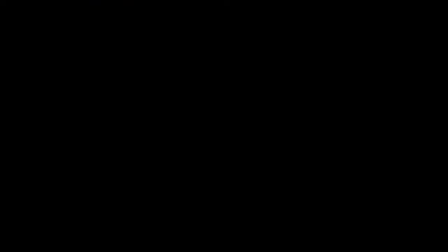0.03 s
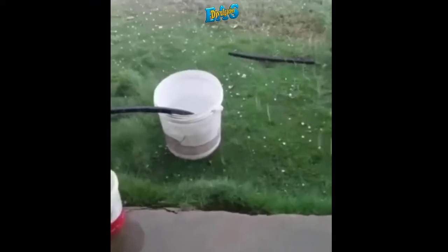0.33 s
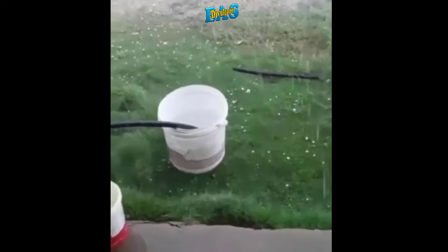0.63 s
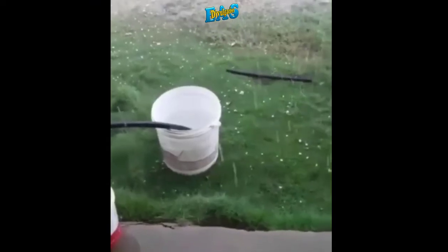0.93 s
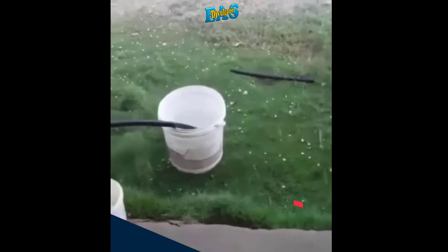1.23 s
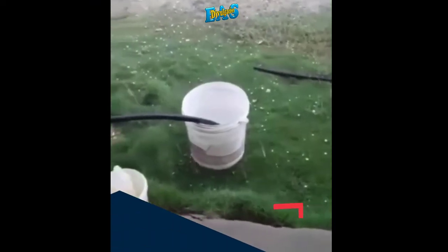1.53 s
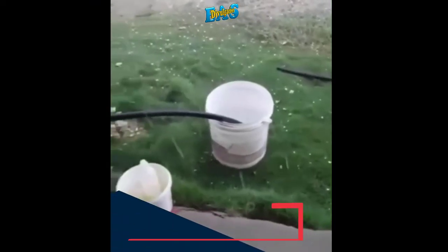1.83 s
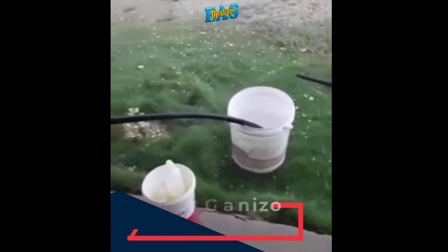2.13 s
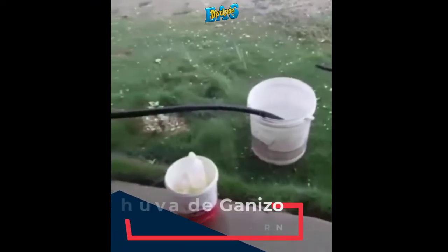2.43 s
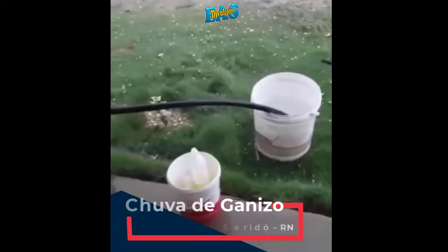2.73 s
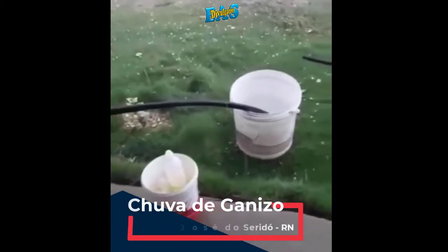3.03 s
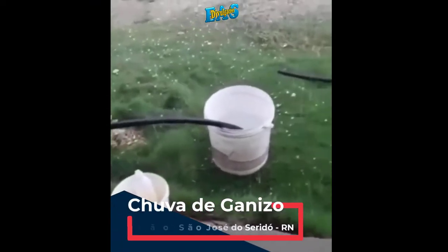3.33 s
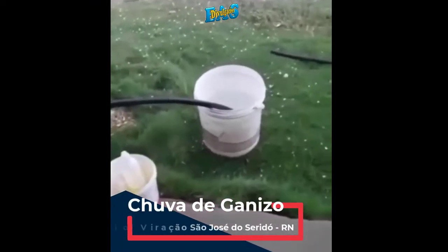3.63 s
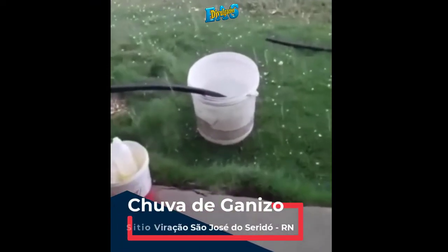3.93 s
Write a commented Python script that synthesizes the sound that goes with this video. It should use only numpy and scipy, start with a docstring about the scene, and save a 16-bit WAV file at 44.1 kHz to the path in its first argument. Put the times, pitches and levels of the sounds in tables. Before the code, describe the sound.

Hail and heavy rain pour onto a yard, with wind buffeting the microphone.

```python
"""Hail and heavy rain pour onto a yard of grass, paving and plastic buckets, fading in from silence.
Countless far impacts merge into a bed of hiss. Over it, near stones burst in short splashy cracks,
some with a brief ring from what they strike. Gusts rumble underneath and buffet the microphone
with low thumps. The mix is centred except for two treble bands that sound wide."""
import sys
import numpy as np
from scipy import signal
from scipy.fft import rfft, irfft
from scipy.io import wavfile
from scipy.ndimage import uniform_filter1d

SR = 44100
rng = np.random.default_rng(int(sys.argv[2]) if len(sys.argv) > 2 else 0)


def dump(signal):
    """Clip the signal to [-1, 1] and save it as 16-bit WAV at the path in sys.argv[1]."""
    limited = np.clip(np.atleast_2d(signal).T, -1, 1)
    pcm = np.round(limited * 32767).astype(np.int16)
    wavfile.write(sys.argv[1], SR, pcm)


N = 176400

# Tone of the hiss, plus an overall treble drop above 8 kHz. Each row: frequency in Hz, level in dB.
WASH_EQ = [(30, -25), (120, -16), (350, -16), (720, -10.5), (1100, -3.5), (1700, -2), (2250, -0.55),
           (3000, -2.5), (4600, 0), (6000, -1.5), (7800, -2), (8100, -7), (9000, -7.5), (10800, -14),
           (12900, -8.5), (13400, -37)]
# How hard it pours, riding both wash and patter. Each row: time in seconds, gain in dB.
DOWNPOUR_RIDE = [(.4, -27), (.6, -27), (.8, -26), (1.03, -29), (1.17, -31), (1.3, -28), (1.38, -32.5),
                 (1.46, -29.5), (1.7, -31), (1.97, -30), (2.1, -26), (2.18, -27.5), (2.5, -25),
                 (2.66, -27.5), (2.85, -26.5), (3.0, -26), (3.09, -28), (3.17, -26.5), (3.4, -25),
                 (3.75, -27), (4, -27)]
# Near hailstones. Each row: start in seconds, level in dB before trim, attack in seconds,
# brightness in dB per octave, ring pitch in Hz, ring against crack in dB before the ring boost.
NEAR_STONES = [(.397, -18, 0.0015, -5, 2230, -14), (.501, -26.5, 0.0031, 0, 4380, -3),
               (.586, -23, 0.0094, 2, 2345, -8.5), (.657, -26.5, .006, -0.5, 6000, -8),
               (.728, -28, 0.0054, -6, 6500, -10), (.755, -21, 0.0068, 1, 7680, -7),
               (.764, -26.5, 0.0057, -1, 4660, -3), (.780, -28.5, 0.0074, -5, 2015, -7),
               (.803, -29, 0.0064, -5, 4780, -4), (.968, -27.5, 0.023, -1.5, 6130, -11),
               (1.063, -24, 0.007, -2.5, 2340, -11), (1.08, -30.5, 0.007, -5.5, 2170, -5),
               (1.204, -35, .005, 4, 6300, -15), (1.245, -36, 0.0064, -5, 2480, -15),
               (1.408, -25.5, 0.0022, 0.5, 4400, -9), (1.625, -40, 0.0044, 3, 5000, -14),
               (1.818, -33, 0.0039, 1, 5370, -17), (1.895, -28, 0.0073, -1, 7480, -7),
               (1.993, -27, 0.014, -2.5, 5050, -7), (2.0425, -20.5, 0.0014, -3.5, 4650, -5),
               (2.096, -27.5, 0.0059, -5, 2224, -9.5), (2.113, -31, 0.0076, 1, 6360, -12),
               (2.186, -32, 0.0053, 4, 5000, -12), (2.258, -29, 0.004, -8, 3520, -6),
               (2.321, -27.5, 0.0064, 0, 6140, -8), (2.396, -26.5, 0.0068, -4, 5070, -7),
               (2.422, -24, 0.0068, 0.5, 2075, -9), (2.580, -28, 0.013, -2.5, 5600, -19),
               (2.700, -25.5, 0.0028, 1.5, 4330, -2), (2.778, -27, 0.0034, -1.5, 5700, 0),
               (2.782, -26, .003, -2.5, 4900, -2), (2.812, -27, 0.0042, -3, 7700, -10),
               (2.897, -28.5, 0.0075, 3, 7660, -4), (2.950, -23, 0.0066, -2, 5000, -25),
               (2.971, -25, 0.0046, -5.5, 1570, -15), (3.008, -27, .008, -3, 6700, 1),
               (3.120, -24, .006, -3.5, 2256, -10), (3.266, -23.5, 0.011, -4.5, 7630, -4),
               (3.295, -26.5, 0.0041, -4.5, 7200, -13), (3.348, -25, 0.0076, -3.5, 4600, -14),
               (3.473, -25.5, 0.0046, 0, 6500, -17), (3.526, -23.5, 0.0038, -7, 2270, -20),
               (3.548, -29, 0.004, -3, 5600, -2), (3.612, -26, 0.003, -5.5, 4580, -4),
               (3.682, -27.5, 0.011, -0.5, 6400, -13), (3.825, -28.5, 0.016, 0.5, 7650, -7),
               (3.977, -27.5, 0.0051, 2, 5600, -7)]
# Tone of the crack, plus an overall treble drop above 8 kHz. Each row: frequency in Hz, level in dB.
CRACK_EQ = [(200, -47), (700, -24.5), (1200, -9.5), (2250, 0), (3200, -2), (4700, 4.5), (7700, 2),
            (8200, -10.5), (11000, -8.5), (13000, -13), (14200, -14)]
# Resonances that all impacts share. Each row: centre in Hz, half-width in Hz, boost in dB.
IMPACT_RESONANCES = [(2300, 65, 2.5), (4970, 60, 0), (7630, 120, 1.5)]
# Tone of the wind rumble. Each row: frequency in Hz, level in dB.
RUMBLE_EQ = [(25, -38), (50, -7.5), (100, 3.5), (160, 2), (320, -6.5), (500, -14.5), (800, -20),
             (1500, -49)]
# Rise and fall of the rumble. Each row: time in seconds, gain in dB.
RUMBLE_RIDE = [(.42, -45.5), (.55, -49.5), (.6, -35.5), (.84, -51.5), (.9, -42.5), (.98, -39), (1.1, -44),
               (1.35, -40.5), (1.45, -49), (1.52, -42.5), (1.75, -52), (1.88, -36), (2.08, -43),
               (2.27, -37), (2.63, -38.5), (2.67, -62), (2.74, -48), (2.79, -42), (2.92, -39.5),
               (3.1, -27.5), (3.3, -46), (3.45, -33.5), (3.72, -37), (4, -35.5)]
# Wind thumps on the microphone. Each row: centre in seconds, level in dB before trim,
# pitch in Hz, half-length in cycles.
WIND_THUMPS = [(.637, -24.5, 140, 0.45), (.721, -29, 150, 0.49), (.75, -26.5, 149, .4),
               (.783, -28.5, 170, 0.45), (0.964, -24.5, 128, 0.51), (1.155, -26.5, 198, 0.55),
               (1.197, -25.5, 190, 0.59), (1.268, -28, 141, 0.43), (1.355, -18.5, 174, 0.37),
               (1.383, -23.5, 162, 0.38), (1.503, -22, 232, 0.39), (1.582, -28.5, 236, .4),
               (1.846, -20.5, 179, 0.71), (1.862, -17.5, 288, .45), (1.891, -13.5, 294, 0.54),
               (1.898, -15.5, 190, 0.42), (1.923, -24, 280, .5), (1.951, -21.5, 270, .45),
               (2.009, -19.5, 206, 0.43), (2.04, -21.5, 338, 0.38), (2.075, -37, 230, .4),
               (2.156, -21, 170, 0.32), (2.254, -16.5, 143, .45), (2.271, -18, 219, .4),
               (2.344, -15, 256, 0.49), (2.456, -16, 207, 0.62), (2.531, -21, 320, 0.67),
               (2.544, -6.5, 232, 0.33), (2.622, -22.5, 128, 0.64), (2.797, -24, 200, 0.51),
               (2.856, -24, 170, 0.48), (2.997, -17, 136, .4), (3.015, -21, 156, 0.57),
               (3.064, -21, 131, 1), (3.083, -18, 145, 0.43), (3.103, -18, 233, .35),
               (3.116, -15.5, 280, 0.43), (3.221, -17.5, 204, 0.48), (3.438, -11, 185, 0.28),
               (3.466, -11, 235, 0.46), (3.604, -20, 146, 0.35), (3.615, -14.5, 254, 0.43),
               (3.667, -15.5, 232, 0.26), (3.72, -32, 180, 0.55), (3.787, -19.5, 160, 0.36),
               (3.801, -9.5, 300, 0.51), (3.92, -21, 142, 0.65), (3.976, -12.5, 221, 0.51)]
# Stereo width of the whole mix: two treble bands, about 5-8 and 12-14 kHz, sound wide.
# Each row: frequency in Hz, side gain in dB.
SIDE_EQ = [(4050, -77), (4250, -31), (4800, -6), (7850, -6.5), (8020, -34), (11700, -34), (12100, -10.5),
           (13200, -8), (14200, -14)]
# Master fade-in. Each row: time in seconds, gain in dB.
FADE_IN = [(.352, -47), (.358, -24.5), (.385, -15), (.45, -8), (.52, -4.5), (.58, 1)]

WASH_TRIM_DB, PATCH_DB, SWELL_DB = -1.47, 3, .5
CRACK_HOLD_S, CRACK_T60_S = 0.0052, 0.12
RING_BOOST_DB, RING_T60_S = 2.5, 0.11
ECHO_DB, ECHO_T60_S = -13, 0.11
PATTER_PER_S, PATTER_DB, PATTER_SPREAD_DB, PATTER_TILT_DB = 75, -12, 8.5, 2.5
PATTER_LOW_HZ, PATTER_HIGH_HZ, PATTER_CUTOFF_HZ = 1560, 7870, 13000
NEAR_TRIM_DB, THUMP_TRIM_DB = 1, -4
RUMBLE_LUMP_DB, THUMP_STEEPNESS, WAKE_DB, WAKE_S = 2.5, 0.37, -15.5, 0.011
LOW_CUT_HZ, HIGH_CUT_HZ = 29, 14150
TIME_S, FREQ_HZ = np.arange(N) / SR, np.fft.rfftfreq(N, 1 / SR)


def amp(db):
    """Decibels to gain."""
    return 10 ** (np.asarray(db) / 20)


def unit(x):
    """Scales to rms 1."""
    return x / np.sqrt(np.mean(x ** 2) + 1e-20)


def at_hz(points, hz):
    """Reads an EQ curve on a log-frequency axis."""
    f, value = np.transpose(points)
    return np.interp(np.log(hz + 1), np.log(f), value)


def at_time(points, t):
    """Reads a fader ride."""
    return np.interp(t, *np.transpose(points))


def add(mix, start_s, sound):
    """Drops a sound into the mix."""
    part = mix[..., max(round(start_s * SR), 0):][..., :sound.shape[-1]]
    part += sound[..., :part.shape[-1]]


def noise(shape, gain):
    """Noise of rms 1, coloured by the function gain(Hz)."""
    size = shape[-1]
    spectrum = rfft(rng.standard_normal(shape)) * gain(np.fft.rfftfreq(size, 1 / SR))
    return unit(irfft(spectrum, size))


def wander(rate_hz):
    """A smooth random modulator of rms 1."""
    return noise((N,), lambda f: f / (f + rate_hz / 10) / (1 + (f / rate_hz) ** 2))


def far_wash():
    """Rain and far hail merge into a finely patchy hiss."""
    hiss = noise((2, N), lambda f: amp(at_hz(WASH_EQ, f)))
    spectra = signal.stft(hiss, nperseg=1024, noverlap=768)[2]
    # Random gain patches, smoothed over frequency and then time, give the hiss its grain.
    patches = uniform_filter1d(rng.standard_normal(spectra.shape[1:]), size=3, axis=0)
    patches = unit(uniform_filter1d(patches, size=9, axis=1))
    grainy = signal.istft(spectra * amp(PATCH_DB * patches), nperseg=1024, noverlap=768)[1][:, :N]
    level_db = WASH_TRIM_DB + at_time(DOWNPOUR_RIDE, TIME_S) + SWELL_DB * wander(rate_hz=9)
    return unit(grainy) * amp(level_db)


def hailstone(level_db, attack_s, tilt_db, ring_hz, ring_db):
    """A burst of shattering ice and spray, a short ping of what it strikes, and the yard's echo."""
    def colour(f):
        resonance_db = sum(db / (1 + ((f - hz) / width) ** 2) for hz, width, db in IMPACT_RESONANCES)
        return amp(at_hz(CRACK_EQ, f) + tilt_db * np.log2((f + 100) / 4000) + resonance_db)

    size = 8192
    t = np.arange(size) / SR
    attack = np.minimum(t / attack_s, 1)
    decay = amp(-60 * np.maximum(t - attack_s - CRACK_HOLD_S, 0) / CRACK_T60_S)
    echo_tail = amp(ECHO_DB - 60 * t / ECHO_T60_S)
    crack = noise((2, size), colour) * np.hypot(decay, echo_tail)
    ping = np.sqrt(2) * np.sin(2 * np.pi * (ring_hz * t + rng.random((2, 1))))
    ping *= amp(RING_BOOST_DB + ring_db - 60 * np.maximum(t - attack_s, 0) / RING_T60_S)
    return amp(level_db) * attack * (crack + ping) / np.hypot(1, amp(ring_db))


def hail_patter():
    """Small stones land all around at the downpour's level; the patter is low-passed at 13 kHz."""
    patter = np.zeros((2, N))
    count = int(PATTER_PER_S * N / SR)
    for k, (jitter, size, tilt, pitch) in enumerate(rng.uniform(-1, 1, (count, 4))):
        start_s = (k + 1 + jitter) / PATTER_PER_S
        level_db = at_time(DOWNPOUR_RIDE, start_s) + PATTER_DB + PATTER_SPREAD_DB * size
        ring_hz = PATTER_LOW_HZ * (PATTER_HIGH_HZ / PATTER_LOW_HZ) ** ((pitch + 1) / 2)
        hit = hailstone(level_db, attack_s=0.0027, tilt_db=PATTER_TILT_DB * tilt,
                        ring_hz=ring_hz, ring_db=-5)
        add(patter, start_s, hit)
    return irfft(rfft(patter) * (FREQ_HZ < PATTER_CUTOFF_HZ), N)


def near_hail():
    """Close stones crack in the foreground; the cracks carry a thin fizz up to the high cut."""
    hits = np.zeros((2, N))
    for start_s, level_db, *character in NEAR_STONES:
        add(hits, start_s, hailstone(level_db + NEAR_TRIM_DB, *character))
    return hits


def wind():
    """Gusts on the microphone: a lumpy rumble with single thumps on top."""
    rumble = noise((N,), lambda f: amp(at_hz(RUMBLE_EQ, f)))
    lumps = amp(RUMBLE_LUMP_DB * wander(rate_hz=41))
    gusts = unit(rumble * lumps) * amp(at_time(RUMBLE_RIDE, TIME_S))
    for centre_s, level_db, hz, cycles in WIND_THUMPS:
        thump = wind_thump(level_db + THUMP_TRIM_DB, hz, cycles)
        add(gusts, centre_s - len(thump) / 2 / SR, thump)
    return gusts


def wind_thump(level_db, hz, cycles):
    """An eddy hits the microphone: a steep pressure swing or brief flutter in a puff of turbulence."""
    size = 4096
    t = (np.arange(size) - size / 2) / SR
    phase = 2 * np.pi * hz * t
    window = np.exp(-.5 * (hz * t / cycles) ** 2)
    polarity = rng.choice([-1, 1])
    swing = np.sin(phase) * window + THUMP_STEEPNESS * np.sin(2 * phase) * window ** 2
    # The wake is a band of noise around the thump's pitch.
    wake = noise((size,), lambda f: f ** 2 / (f ** 2 + (hz / 2) ** 2) / (1 + (f / (2.09 * hz)) ** 4))
    wake *= amp(WAKE_DB) * np.exp(-.5 * (t / WAKE_S) ** 2)
    return amp(level_db) * (polarity * swing + wake)


def scene():
    """Mixes rain, hail and wind in the centre; two treble bands of the mix sound wide."""
    gusts = wind()
    mid, side = far_wash() + hail_patter() + near_hail()
    side = irfft(rfft(side) * amp(at_hz(SIDE_EQ, FREQ_HZ)), N)
    return np.array([mid + side, mid - side]) + gusts


def record(dry):
    """The microphone's low cut, a fade-in from silence, then a steep high cut."""
    low_cut = signal.butter(2, LOW_CUT_HZ, "highpass", fs=SR, output="sos")
    fade = amp(at_time(FADE_IN, TIME_S)) * (TIME_S > FADE_IN[0][0])
    high_cut = signal.firwin(511, HIGH_CUT_HZ, window=("kaiser", 9), fs=SR)
    return signal.oaconvolve(signal.sosfilt(low_cut, dry) * fade, high_cut[None], "same")


dry = scene()
out = record(dry)
dump(out)
```